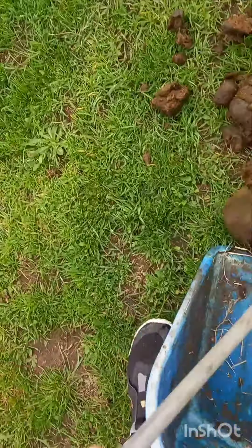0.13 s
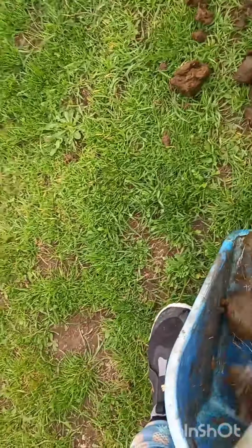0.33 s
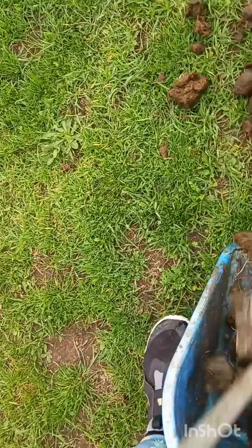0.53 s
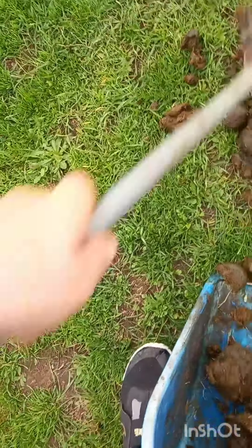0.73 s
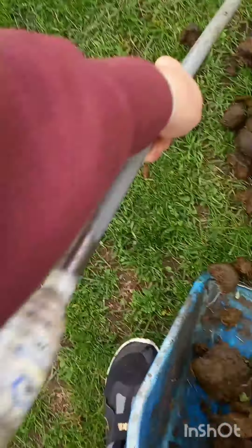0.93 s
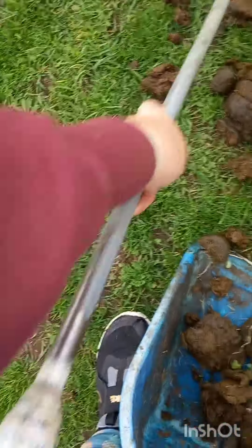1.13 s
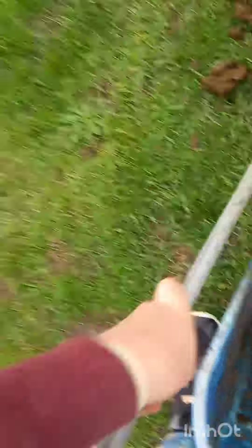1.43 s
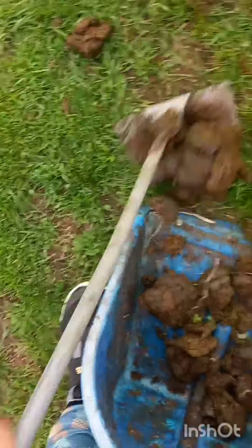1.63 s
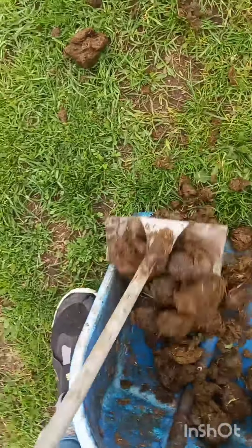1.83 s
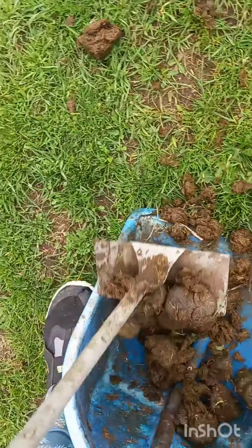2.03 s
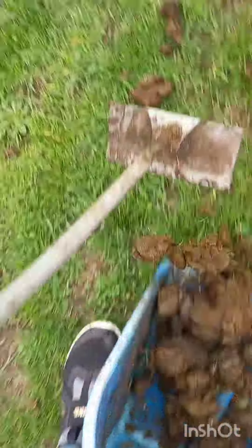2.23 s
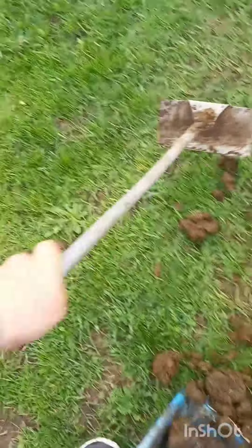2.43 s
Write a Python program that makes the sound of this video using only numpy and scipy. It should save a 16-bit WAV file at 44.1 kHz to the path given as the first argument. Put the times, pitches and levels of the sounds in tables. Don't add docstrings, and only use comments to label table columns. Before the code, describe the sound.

Scraping and thudding of a metal blade loading lumps of dung into a hollow plastic tub

```python
import sys
import numpy as np
from scipy import signal
from scipy.fft import rfft, irfft
from scipy.io import wavfile

SR = 44100
rng = np.random.default_rng(int(sys.argv[2]) if len(sys.argv) > 2 else 0)


def volts_from_db(level):
    exponent = np.asarray(level, float) / 20
    return 10 ** exponent


def dump(signal):
    limited = np.clip(np.atleast_2d(signal).T, -1, 1)
    pcm = np.round(limited * 32767).astype(np.int16)
    wavfile.write(sys.argv[1], SR, pcm)


N = 114660

# pitch_hz, width_hz, level_db
BLADE_MODES = [(776, 69, 6.5), (1001, 62, 10), (1325, 120, 6), (1617, 134, 4), (2080, 200, -2.5),
               (2983, 170, -5), (4410, 123, -7.5), (6300, 230, -47), (8210, 480, -17.5)]


def rms_one(x):
    return x / np.sqrt(np.mean(x ** 2) + 1e-20)


def level_curve(rows):
    s, db = np.transpose(rows)
    return np.interp(np.arange(N) / SR, s, db, -120, -120)


def pan(x, db):
    return np.array([x * volts_from_db(db / 2), x * volts_from_db(-db / 2)])


def late(x):
    lag_s = 0.00014
    return np.array([x[0], np.roll(x[1], round(lag_s * SR))])


def add(out, s, x):
    i = int(s * SR)
    out[:, i:i + x.shape[1]] += x[:, :N - i]


def drift(rate):
    hop = 40
    r = np.exp(-2 * np.pi * rate * hop / SR)
    noise = rng.standard_normal(N // hop + 2002)
    slow = signal.lfilter([1], [1, -2 * r, r * r], noise)[2000:]
    return np.interp(np.arange(N) / hop, np.arange(len(slow)), rms_one(slow))


def resonate(x, hz, width_hz):
    r = np.exp(-np.pi * width_hz / SR)
    top = [(1 - r * r) / 2, 0, (r * r - 1) / 2]
    return signal.lfilter(top, [1, -2 * r * np.cos(2 * np.pi * hz / SR), r * r], x + 1e-18)


def colour(x, points):
    hz, db = np.transpose(points)
    f = np.fft.rfftfreq(N, 1 / SR) + 1
    gain = volts_from_db(np.interp(np.log(f), np.log(hz), db, -80, -80))
    return rms_one(irfft(rfft(x) * gain, N))


def grains(per_s, spread_db):
    chance, size, sign = rng.random((3, N))
    strength = volts_from_db(spread_db * np.minimum(-np.log(size + 1e-9), 4))
    return rms_one((chance < per_s / SR) * strength * np.sign(sign - 0.5))


def wind():
    # start_s (at the peak), level_db, left_minus_right_db
    puffs = [(0.367, -37.5, -1), (.47, -48, 3), (1.004, -41.5, -17), (1.124, -42, -16), (1.303, -46, 7),
             (1.463, -36, -8.5), (1.586, -38, -17), (1.672, -37, 7.5), (1.778, -37, -12.5),
             (1.919, -44, 13), (1.981, -32.5, -3.5), (2.21, -44.5, 10.5), (2.334, -33.5, 13)]
    # pitch_hz, level_db (per Hz)
    rumble_spectrum = [(30, -7), (50, -2), (80, 3), (130, -5), (200, -14.5), (400, -40)]
    puff_s, breeze_db = 0.042, -54.5
    lump_db, lumps_per_s = 3.5, 11.8
    t = np.arange(N) / SR
    blow = volts_from_db(breeze_db)
    for s, db, side_db in puffs:
        blow = blow + pan(volts_from_db(db) * np.exp(-((t - s) / puff_s) ** 2), side_db)
    ports = []
    for _ in range(2):
        rumble = colour(rng.standard_normal(N), rumble_spectrum)
        ports.append(rumble * volts_from_db(lump_db * drift(lumps_per_s)))
    return np.array(ports) * blow


def hum():
    hz, width_hz, wander_hz = 71.3, 14, 2.996
    band_db, side_db, tone_db = -54, -17, -48
    bands = []
    for noise in rng.standard_normal((2, N + SR)):
        narrow = resonate(resonate(noise, hz, width_hz), hz, 3 * width_hz)
        bands.append(rms_one(narrow[-N:]))
    mid, side = bands
    band = volts_from_db(band_db) * (mid + volts_from_db(side_db) * side * [[1], [-1]])
    phase = 2 * np.pi * np.cumsum(hz + wander_hz * drift(3.07)) / SR
    return band + np.sqrt(2) * volts_from_db(tone_db) * np.sin(phase)


def field():
    # pitch_hz, level_db (per Hz)
    field_spectrum = [(120, -18.5), (200, -7.5), (550, -22.5), (1300, -21), (2500, -34.5), (5300, -45.5),
                      (7500, -28), (16000, -47)]
    level_db, alike = -65, 0.1
    mid, side = colour(rng.standard_normal((2, N)), field_spectrum)
    wide = mid + np.sqrt((1 - alike) / (1 + alike)) * side * [[1], [-1]]
    return volts_from_db(level_db + 2.64 * drift(5)) * wide


def swishes():
    # start_s, length_s, level_db, left_minus_right_db, treble_db
    brushes = [(.0, 0.058, -62, -0.5, 6), (0.063, 0.085, -56.5, 0, 6.5), (0.186, 0.19, -66, -3.5, 7.5),
               (0.318, 0.099, -59.5, -10, 2.5), (0.433, 0.075, -72.5, -22, 6),
               (0.535, 0.03, -68, 5.5, 24.5), (0.572, 0.051, -56.5, 2.5, 6.5), (0.638, 0.044, -54, -5, 6.5),
               (0.697, 0.029, -66, -1, 7.5), (0.754, 0.07, -62, -9.5, 6), (0.855, 0.014, -31.5, -4, 3.5),
               (0.873, 0.018, -47.5, 9, -6), (0.895, 0.033, -31, -1.5, 4.5), (0.924, 0.067, -48.5, 2, -19),
               (1.157, 0.068, -50, -0.5, 3), (1.215, 0.2, -63, 4, 6), (1.36, 0.51, -62.5, 3, 3),
               (1.523, 0.064, -62.5, 2, 0), (1.68, 0.097, -55, -12, 8.5), (1.714, 0.057, -46, -4, 5.5),
               (1.783, 0.11, -50.5, -3, -27), (2.007, 0.49, -95, -17, 17.5),
               (2.396, 0.66, -64.5, -1.5, 3.5)]
    # pitch_hz, level_db (per Hz)
    grass_spectrum = [(700, -30), (1000, -12.5), (1700, -5), (3000, -8.5), (3700, -1), (10500, -7),
                      (12000, -2.5), (16000, -8.5)]
    # pitch_hz, width_hz, level_db
    dips = [(2380, 200, -14), (3350, 200, -14)]
    attack, release = 0.19, 0.14
    sag_db, flutter_db, treble_side_db = 4, 2, -11
    a, b = colour([grains(5000, 4.05) for _ in range(2)], grass_spectrum)
    stream = late(np.array([a + 1.02 * b, a - 0.48 * b]))
    for hz, width_hz, db in dips:
        stream = stream - (1 - volts_from_db(db)) * resonate(stream, hz, 2 * width_hz)
    sos = signal.butter(2, 9000, "high", fs=SR, output="sos")
    treble = signal.sosfilt(sos, stream) * volts_from_db([[treble_side_db / 2], [-treble_side_db / 2]])
    t, full, extra = np.arange(N) / SR, 0, 0
    for s, length, db, side_db, treble_db in brushes:
        u = (t - s) / max(length, 0.003)
        rise = np.clip(u / attack, 0, 1)
        fall = np.exp(-np.clip(u - 1, 0, 50) / release)
        shape = pan(volts_from_db(db - sag_db * np.clip(u, 0, 1)) * rise * fall, side_db)
        full = full + shape
        extra = extra + shape * (volts_from_db(treble_db) - 1)
    return (full * stream + extra * treble) * volts_from_db(flutter_db * drift(19.3))


def stroke(press_db, modes, per_s, between_db, own=0.99):
    spread_db, patch_db = 2.5, 2.5
    press, out = volts_from_db(press_db), []
    shared = grains(per_s, spread_db)
    patches = [patch_db * drift(24.5) for _ in modes]
    for _ in range(2):
        grit = (shared + own * grains(per_s, spread_db)) * press
        rings = 0
        for k, ((hz, width_hz, db), patch) in enumerate(zip(modes, patches)):
            rings = rings + (-1) ** k * volts_from_db(db + patch) * resonate(grit, hz, width_hz)
        between = resonate(resonate(grit, 1370, 830), 1500, 1660)
        out.append(rings + volts_from_db(between_db) * between)
    return np.array(out) * np.sqrt(np.mean(press ** 2) / np.mean(np.square(out)))


def scraper():
    # start_s, level_db
    lift = [(.02, -67), (.07, -54.5), (.125, -46), (.16, -61), (.25, -76)]
    bite = [(.9, -70), (.908, -42), (.922, -43.5), (.94, -64), (.97, -64), (.985, -60), (1.0, -64.5),
            (1.04, -88), (1.06, -98)]
    slide = [(1.175, -67), (1.19, -54), (1.22, -58), (1.27, -64), (1.31, -60), (1.36, -71), (1.43, -59.5),
             (1.5, -71.5), (1.565, -56), (1.66, -84)]
    drag = [(1.729, -29), (1.734, -22), (1.755, -34.5), (1.8, -34.5), (1.85, -30.5), (1.87, -40.5),
            (1.895, -29), (1.912, -49), (1.97, -68.5)]
    shake = [(1.74, -34), (1.77, -30), (1.8, -32), (1.815, -29.5), (1.84, -25), (1.853, -32), (1.868, -35),
             (1.893, -25), (1.915, -47)]
    # pitch_hz, width_hz, level_db
    lift_modes = [(1367, 74, 0), (1579, 40, 5.5), (1840, 260, -5.5), (2350, 140, -19)]
    bite_modes = [(1556, 26, -4), (2023, 37, -0.5), (3594, 110, 0.5), (4370, 200, -5)]
    slide_modes = [(1350, 78, 10.5), (1630, 32, 9.5), (1815, 32, 9.5), (2910, 73, 12), (4140, 200, 2.5),
                   (4450, 100, -6), (7140, 170, 1), (8500, 200, 5.5)]
    judder_modes = [(117, 43, -2), (217, 39, -4.5), (337, 150, -7), (440, 76, 5.5)]
    grit_per_s, coarse_per_s, slips_per_s = 1800, 1500, 600
    return (stroke(level_curve(lift), lift_modes, grit_per_s, -22)
            + stroke(level_curve(bite), bite_modes, grit_per_s, -31)
            + stroke(level_curve(slide), slide_modes, grit_per_s, -30)
            + stroke(level_curve(drag), BLADE_MODES, coarse_per_s, -18)
            + stroke(level_curve(shake), judder_modes, slips_per_s, -40, own=0.45))


def sing():
    # start_s, level_db
    sing_curve = [(.05, -82), (.1, -58), (.12, -53), (.13, -55), (.142, -47.5), (.17, -68), (.2, -73)]
    hz, rise_hz_per_s = 1616, 270
    t = np.arange(N) / SR - sing_curve[2][0]
    tone = np.sin(2 * np.pi * (hz * t + rise_hz_per_s * t ** 2 / 2))
    return pan(np.sqrt(2) * volts_from_db(level_curve(sing_curve)) * tone, 0.1)


def tumble():
    # start_s, level_db
    falls = [
        [(.1, -63.5), (.18, -57.5), (.23, -45.5), (.33, -55), (.365, -41), (.5, -64), (.54, -100)],
        [(.57, -54.5), (.6, -53.5), (.675, -46), (.7, -56), (.75, -66)],
        [(.87, -63), (.885, -37.5), (.91, -35), (.95, -58.5), (.99, -55.5), (1.06, -72.5)],
        [(1.17, -52.5), (1.24, -59), (1.27, -80)],
    ]
    # pitch_hz, width_hz, level_db
    tray_modes = [(215, 106, -0.5), (437, 192, 1), (605, 260, -8.5)]
    loudest_db = np.max([level_curve(rows) for rows in falls], axis=0)
    return late(stroke(loudest_db, tray_modes, 1600, -20, own=0.45))


def ticks():
    # start_s, level_db (peak)
    snaps = [(0.125, -48.5), (0.563, -47.5), (.598, -49.5), (0.612, -57), (2.036, -63), (2.1335, -54.5),
             (2.1726, -56.5), (2.36, -55), (2.391, -57.5)]
    out, t = np.zeros((2, N)), np.arange(SR // 50) / SR
    sos = signal.butter(6, 6900, "high", fs=SR, output="sos")
    for s, db in snaps:
        burst = rng.standard_normal(len(t)) * np.exp(-t / 0.0016)
        add(out, s, pan(volts_from_db(db + 11) * signal.sosfilt(sos, burst), -8))
    return out


def thuds():
    # start_s, level_db (peak), pitch_hz, crack_db, left_minus_right_db
    knocks = [(0.359, -30, 440, -17.5, -4), (0.439, -39, 420, -20, -4), (.575, -38, 239, -10, -3),
              (0.636, -33, 575, -22.5, -14.5), (0.667, -33.5, 217, -16.5, -18.5),
              (.857, -13.5, 451, -20.5, -4.5), (0.866, -19, 283, -39, -1), (.899, -12, 310, -27.5, -0.5),
              (1.161, -29.5, 260, -25, -8.5), (1.741, -12, 241, -11.5, 0), (2.171, -34, 236, -20, -3.5),
              (2.355, -19, 471, -27, -6),
              (.882, -30, 446, -26, -10), (0.89, -18, 282, -37, 0), (1.745, -14, 337, -22, 0),
                (1.812, -23.5, 426, -35, -12), (1.849, -15.5, 412, -36, 0), (1.886, -18, 454, -15, 2),
                (2.367, -29.5, 294, -20, 0.5), (1.164, -32.5, 562, -38, -6), (.637, -34, 800, -12, -9.5),
                (0.37, -50, 640, -20, -13), (1.8, -39.5, 438, -25, -6.5)]
    # multiple_of_pitch, level_db
    body_parts = [(0.55, 0.5), (1.0, 3), (1.6, -11.5), (2.7, -42)]
    # pitch_hz, width_hz, level_db
    wall_modes = [(1900, 500, 2), (3900, 500, 0), (1400, 400, -2)]
    t60_s, push_s, roughness = 0.025, 0.0018, 2.16
    crack_hz, crack_s = 2830, 0.0046
    width = np.log(1000) / np.pi / t60_s
    out, t = np.zeros((2, N)), np.arange(SR // 8) / SR
    for s, db, hz, crack_db, side_db in knocks:
        rough, hiss = rng.standard_normal((2, len(t)))
        push = (np.cos(2 * np.pi * hz * t) + roughness * rough) * t / push_s * np.exp(-t / push_s)
        body = sum(volts_from_db(d) * resonate(push, hz * m, width * m) for m, d in body_parts)
        body = signal.sosfilt(signal.butter(2, 1.37 * hz, fs=SR, output="sos"), body)
        burst = hiss * np.exp(-t / crack_s)
        crack = 0.4 * resonate(burst, crack_hz, 3.6 * crack_hz)
        crack = crack + sum(volts_from_db(d + 8) * resonate(burst, f, w) for f, w, d in wall_modes)
        thud = body / abs(body).max() + volts_from_db(crack_db) * crack
        add(out, s - 0.001, pan(volts_from_db(db - 1) * thud, side_db))
    return late(out)


def catches():
    # start_s, level_db, left_minus_right_db
    rim_hits = [(1.7338, -25.5, -1), (1.7455, -33, 4), (1.7767, -30, 5), (1.7967, -31, 22),
                (1.8301, -36, 8), (1.842, -36, 18), (1.858, -33, 8), (1.872, -29, 17.5), (1.885, -30, 0),
                (1.8915, -34.5, 17)]
    burst_s, dry_db = 0.0017, -19
    out, t = np.zeros((2, N)), np.arange(SR // 16) / SR
    for s, db, side_db in rim_hits:
        burst = rng.standard_normal(len(t)) * np.exp(-t / burst_s)
        rings = 0
        for hz, width_hz, mode_db in BLADE_MODES:
            own_db = 3.8 * rng.standard_normal()
            rings = rings + volts_from_db(mode_db + own_db) * resonate(burst, hz, 2 * width_hz)
        rings = rings / abs(rings).max() + volts_from_db(dry_db) * resonate(burst, 3500, 3900)
        add(out, s, pan(volts_from_db(db) * rings, side_db))
    return out


def scene():
    air = wind() + hum() + field()
    return air + swishes() + scraper() + sing() + tumble() + ticks() + thuds() + catches()


def top_cut(x):
    return signal.sosfilt(signal.butter(12, 16640, fs=SR, output="sos"), x)


def record(dry):
    bass_cut = signal.butter(3, 38, "high", fs=SR, output="sos")
    mix = signal.sosfilt(bass_cut, dry)
    return top_cut(mix)


dry = scene()
out = record(dry)
dump(out)
```